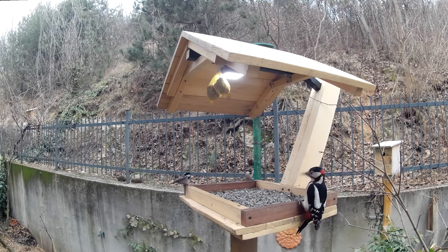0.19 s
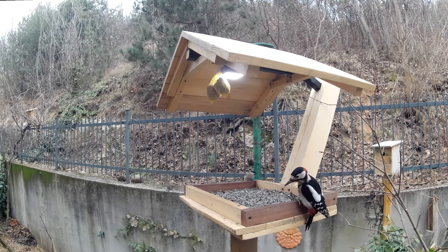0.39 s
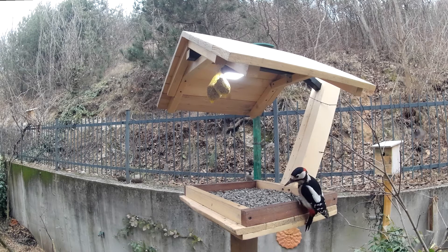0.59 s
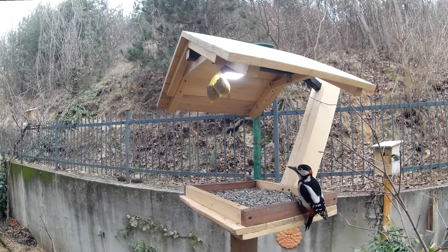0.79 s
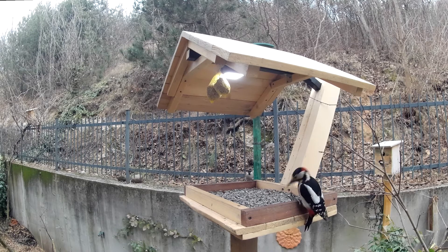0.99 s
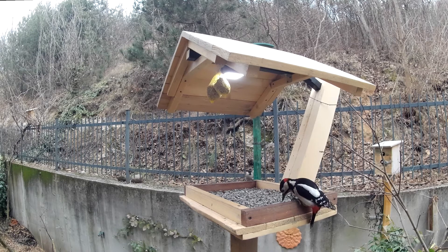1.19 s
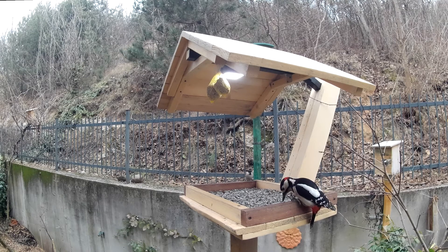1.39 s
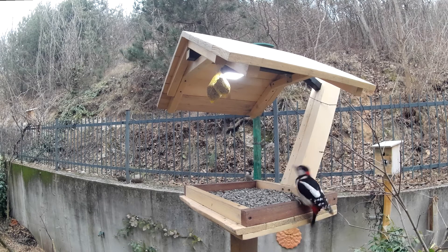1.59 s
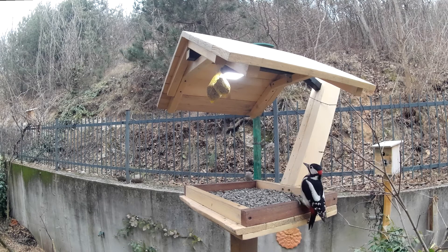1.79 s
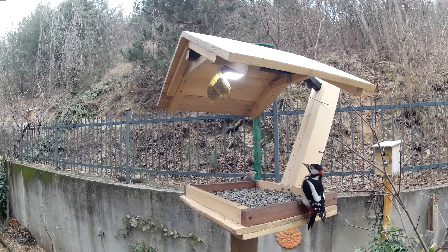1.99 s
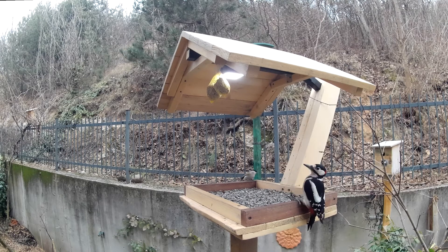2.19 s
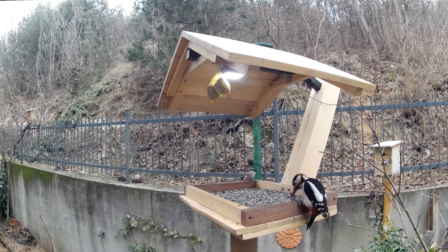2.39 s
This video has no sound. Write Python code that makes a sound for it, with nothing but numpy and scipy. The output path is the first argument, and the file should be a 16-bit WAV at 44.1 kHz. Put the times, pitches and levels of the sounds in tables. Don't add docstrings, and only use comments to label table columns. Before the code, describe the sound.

A woodpecker lands hard on a wooden feeder tray, then taps and stirs the seeds

```python
import sys
import numpy as np
from scipy import signal
from scipy.io import wavfile
from scipy.ndimage import uniform_filter1d

SR = 44100
rng = np.random.default_rng(int(sys.argv[2]) if len(sys.argv) > 2 else 0)


def volts_from_db(level):
    exponent = np.asarray(level, float) / 20
    return 10 ** exponent


def store_wav(level_fs):
    pcm = np.round(np.clip(np.atleast_2d(level_fs), -1, 1) * 32767)
    wavfile.write(sys.argv[1], SR, pcm.T.astype(np.int16))


N = 110250
PEAK_AT = 200

# frequency_hz, density_db (per Hz)
HISS = [(30, -1), (300, -2.5), (900, -12), (2000, -15), (5000, -17.5), (9000, -22.5), (15000, -36.5)]
# start_ms, length_ms
CURRENT_PAUSES = [(3.5, .25), (7.1, .28), (9.65, .55), (12.55, .55), (15.45, .55), (18.35, .55), (21.2, .5)]
# pitch_hz, width_hz, level_db
WHINES = [(2780, 40, -73), (3120, 51, -80), (10720, 200, -83), (12600, 450, -85.5)]
# frequency_hz, density_db (per Hz)
GARDEN = [(150, -5), (400, 3.5), (1500, 1), (2800, -8.5), (4000, -9.5), (6000, -16), (8500, -15.5),
          (15000, -34)]
# frequency_hz, density_db (per Hz)
WIND = [(20, 0.5), (60, 0), (120, -4), (200, -8), (350, -17.5), (600, -27), (1200, -56.5)]
# time_s, level_db
GUSTS = [(0, -53), (.08, -56.5), (.17, -54.5), (.23, -32), (.29, -46), (0.331, -56.5), (0.451, -57.5),
         (1.801, -63), (1.85, -47.5), (1.95, -60), (2.098, -64)]
# start_s, pitch_hz,
# swings (cycles), level_db, sign (+1 or -1)
PUFFS = [
    (0.185, 88, 1.12, -20.5, -1),
    (.192, 198, 3.2, -31, 1),
    (.221, 50.6, 1.7, -9.5, 1),
    (0.238, 40.2, .52, -22, -1),
    (.2485, 30, 1.05, -14, 1),
    (.284, 27, 1.4, -27, 1),
    (.312, 480, 1.53, -22.5, -1),
    (.6478, 405, 1.6, -38.5, 1),
    (.6945, 320, 1.53, -37.5, 1),
    (1.828, 105, 5.9, -44, -1),
]
# pitch_hz, width_hz, level_db
BOARD = [(1134, 420, 0.5), (1820, 310, 2.5), (2597, 340, 1.5)]
SHELL = [(3696, 890, -2), (4316, 800, 0.5), (5200, 2700, -10.5), (3100, 930, -10.5)]
CRACK = [(6090, 1100, -9.5), (7577, 800, -1.5), (8600, 800, 0.5), (11390, 3100, -6), (13650, 3100, -10.5)]
# pitch_hz, width_hz, level_db
SEED_SHELL = [(3812, 600, 1.5), (4222, 630, -5.5), (3124, 430, -12), (5103, 710, -16)]
TAP_BOARD = [(1120, 340, -3.5), (1494, 460, 0.5), (2760, 490, -2.5)]
# start_s, length_s, shell_db, board_db and crack_db (relative to shell)
SCRAPES = [(0.237, 0.061, -30, -1.5, -10), (0.279, 0.051, -30.5, -10, -6), (0.304, 0.013, -24, -6, -11),
           (0.31, 0.088, -44, -1, -44), (0.34, .011, -33, -24, -10), (0.402, 0.067, -53.5, 1, -2.5),
           (0.639, 0.028, -44, 2.5, -8.5), (0.66, 0.015, -42, -4, -6.5), (0.677, 0.016, -60, -14, -12),
           (0.702, 0.035, -50.5, 11.5, -4), (.726, 0.024, -45.5, 7.5, -3), (0.615, 0.19, -52.5, -2, -2),
           (0.741, 0.027, -50, 10, -5), (0.762, 0.034, -46.5, 4.5, -12.5), (0.845, 0.049, -48, 6.5, -11),
           (1.134, 0.067, -62, -10.5, 2.5), (1.166, 0.039, -48.5, -1, -5), (1.386, .02, -66, 1, -9),
           (1.48, 0.023, -62, 0, -7), (1.718, 0.056, -47.5, -5.5, -8.5), (1.859, 0.1, -55, 1, -7.5),
           (1.977, 0.039, -64, -1, -10)]
# time_s, pitch_hz, level_db
SQUEAK = [
    (.266, 833, -34),
    (.273, 1315, -33),
    (.277, 1780, -25.5),
    (0.286, 1964, -31),
    (0.297, 1904, -29),
    (0.301, 1699, -29.5),
    (0.311, 1360, -34),
]
# peak_s, shell_db, board_db and crack_db (relative to shell)
TAPS = [(.922, -52.5, -1, 0), (0.9818, -49, 4, -8.5), (0.9995, -49, -9.5, -11), (1.035, -51, -8, -14),
        (1.066, -37, -8, -10.5), (1.0983, -52, -10, -17), (1.112, -30, -17.5, -23), (1.1579, -21, -4.5, 5),
        (1.178, -36, -6, -4), (1.193, -45, 4.5, -18.5), (1.2182, -48, 2, 2), (1.3071, -50.5, -5, 4.5),
        (1.342, -55, -1, -8.5), (1.369, -40.5, -8, -20.5), (1.48, -46.5, -11.5, -2.5),
        (1.487, -59.5, -10.5, -4), (1.495, -52.5, -8, -5), (1.704, -44, -14, -15),
        (1.729, -35.5, -7.5, -14), (1.7313, -29.5, -2, -16), (1.741, -36.5, -0.5, -0.5),
        (1.746, -41.5, 0, -10), (1.7512, -49, 7, 0), (1.764, -58, -6, 6), (1.7805, -34, -6.5, -3.5),
        (1.8014, -40.5, -1.5, -1.5), (1.841, -52, 3, -6), (1.867, -39, -3, -9), (1.885, -37, -15, 1.5),
        (1.891, -37.5, -10, 4.5), (1.901, -35.5, -8, -10), (1.929, -44.5, -4, 2.5), (1.94, -43, 3, 4.5),
        (1.975, -57, -6, 3.5), (1.9876, -42.5, -2.5, -5), (1.996, -51.5, -4, -6), (2.06, -57, -7, 6.5),
        (2.1685, -46, -4, -5.5), (2.328, -49, -2.5, 2)]
# peak_s, shell_db, board_db and crack_db (relative to shell), board_hz
KNOCKS = [(0.2264, -43, 5.5, -7, 2150), (0.2501, -13.5, 3, -0.5, 4772), (0.2504, -2.5, -7, -13.5, 1870),
          (0.2511, -23, 5, -4, 2800), (0.2516, -15, 4, -2, 2610), (.2567, -13, -15, -2, 3300),
          (0.2598, -24, -22, 10, 1880), (.2892, -19, -9, -6, 1875), (0.3126, 0.5, -9.5, -22, 2480),
          (.3139, 4.5, -12.5, -8.5, 2440), (0.3164, -14, 6, 12.5, 2560), (.3415, -25.5, -3.5, -8.5, 2660),
          (0.3485, -20.5, -9, -12, 2693), (.362, -46, -6, 4, 1178), (0.4265, -34, 4.5, 11, 1742),
          (0.4273, -45.5, 15.5, 17.5, 5750), (.649, -30.5, 10.5, 9.5, 4470), (0.6504, -38, 6, -4.5, 1280),
          (.659, -28, -11, -4.5, 1310), (.668, -29.5, -8.5, -0.5, 2160), (0.6707, -30.5, 3, 6, 4500),
          (0.6958, -21.5, 7, -10, 1167), (0.705, -26.5, -3, -4, 4400), (0.7068, -35.5, 18.5, -6, 2490),
          (0.7256, -35, -1, 10.5, 2300), (0.735, -49, 16, -3, 2300), (0.7474, -42.5, 17, -10, 2380),
          (0.7518, -34.5, 5, -14, 1900), (.791, -52, 9.5, -8.5, 1550), (.8462, -56, 17, -8.5, 1900),
          (0.8497, -25.5, -13.5, -30.5, 2120), (0.8518, -46.5, 13, -12.5, 2130),
          (0.8554, -44, 14.5, -14, 1700), (0.8655, -42.5, 2, 2, 1200), (0.8675, -53, 11.5, -5, 1190)]
# frequency_hz, width_hz, gain_db
TREBLE_DIPS = [(10100, 270, -22.5), (12220, 740, -19), (14000, 300, -12.5), (15500, 300, -8)]


def evened(x):
    return x / np.sqrt(np.mean(x ** 2) + 1e-20)


def add(mix, start_s, sound):
    part = mix[round(start_s * SR):][:len(sound)]
    part += sound[:len(part)]


def ring(x, modes, tune=0.95):
    out = 0
    for k, (hz, width_hz, db) in enumerate(modes):
        r = np.exp(-np.pi * width_hz / SR)
        poles = [1, -2 * r * np.cos(2 * np.pi * hz * tune / SR), r * r]
        out = out + (-1) ** k * volts_from_db(db) * signal.lfilter([1 - r, 0, r - 1], poles, x)
    return out


def ring_twice(x, modes, tune=0.95):
    return ring(ring(x, modes, tune), modes, tune)


def noise(spectrum, patch_db):
    bin_hz = np.fft.rfftfreq(1024, 1 / SR)
    hz, db = np.transpose(spectrum)
    real, imaginary, patches = rng.standard_normal((N // 256 + 5, 513, 3)).T
    patches = uniform_filter1d(patches, size=12, axis=0)
    patches = evened(uniform_filter1d(patches, size=10, axis=1))
    level_db = np.interp(np.log(bin_hz + 1), np.log(hz), db)[:, None] + patch_db * patches
    bins = (real + 1j * imaginary) * volts_from_db(level_db)
    return evened(signal.istft(bins, nperseg=1024, noverlap=768)[1][:N])


def hiss():
    return volts_from_db(-64.5) * noise(HISS, 0.85)


def buzz():
    picture_hz, first_s = 30.005, 0.00677
    busy_ms, wobble_ms = 23.2, 0.027
    ease_ms, ease_share = 1.2, 0.38
    coupling_ms, edge_ms = 3.9, 0.068
    pictures = (np.arange(N) / SR - first_s) * picture_hz + 1
    ms = pictures % 1 * 1000 / picture_hz
    slip = wobble_ms * rng.standard_normal((80, 8))[pictures.astype(int)]
    load = (ms < busy_ms + slip[:, -1]) * 1.0
    for k, (start_ms, length_ms) in enumerate(CURRENT_PAUSES):
        since = ms - start_ms - slip[:, k]
        load -= (since > 0) & (since < length_ms)
        load += ease_share * ((since > length_ms) & (since < length_ms + ease_ms))
    leak = np.exp(-1000 / (coupling_ms * SR))
    edge = np.exp(-1000 / (edge_ms * SR))
    pulses = signal.lfilter([1, -1], [1, -leak], load)
    return -volts_from_db(-52) * signal.lfilter([1 - edge], [1, -edge], pulses)


def whines():
    out = np.zeros(N)
    for hz, width_hz, db in WHINES:
        out += volts_from_db(db) * evened(ring_twice(rng.standard_normal(N), [(hz, width_hz, 0)], 1))
    return out


def garden():
    return volts_from_db(-60) * noise(GARDEN, -2)


def wind():
    time_s, gust_db = np.transpose(GUSTS)
    level_db = 6.5 + np.interp(np.arange(N) / SR, time_s, gust_db)
    return volts_from_db(np.minimum(level_db, -35)) * noise(WIND, 0.95)


def puff(hz, swings, db, sign):
    u = np.arange(0, 1, hz / swings / SR)
    swing = np.arcsin(0.93 * np.sin(2 * np.pi * swings * u))
    return np.sign(sign) * volts_from_db(db) * swing * abs(np.sin(np.pi * u ** 0.7)) ** 1.3


def scrape(length_s, db, board_db, crack_db):
    grit_per_s, grit_db = 940, 4
    n = round(length_s * SR)
    pick, size, sign = rng.random((3, 9000))[:, :n]
    clicks = (pick < grit_per_s / SR) * volts_from_db(-grit_db * np.log(np.maximum(size, 0.04))) * (sign - 0.5)
    grit = clicks + 0.26 * (sign - 0.5)
    swell = abs(np.sin(np.pi * np.linspace(0, 1, n) ** 0.64)) ** 2.4
    parts = zip((SHELL, BOARD, CRACK), (0, board_db, crack_db))
    return swell * sum(volts_from_db(db + rel_db) * evened(ring_twice(grit, modes)) for modes, rel_db in parts)


def squeak():
    octave_db, jitter = -4, 0.04
    time_s, hz, db = np.transpose(SQUEAK)
    t = np.arange(time_s[0], time_s[-1], 1 / SR)
    shake = evened(uniform_filter1d(rng.standard_normal(size=8000), size=40))[:len(t)]
    phase = 2 * np.pi * np.cumsum(np.interp(t, time_s, hz) * (1 + jitter * shake)) / SR
    return volts_from_db(np.interp(t, time_s, db)) * (np.sin(phase) + volts_from_db(octave_db) * np.sin(2 * phase))


def strike(db, board_db, crack_db, contact_ms, shell, board):
    rise_share, detune, thud_db = 0.3, 0.048, -7.5
    u = np.maximum(np.arange(-PEAK_AT, 900) / SR * 1000 / contact_ms, 0)
    force = np.minimum(u / rise_share, 1) * np.exp(-2.2 * np.maximum(u - rise_share, 0))
    blow = rng.standard_normal(len(u)) * force
    tune = 1 + detune * rng.uniform(-1, 1)
    parts = [ring_twice(blow, modes, tune) for modes in (shell, board, CRACK)]
    parts.append(ring(blow, [(433, 1900, 0)]))
    out = 0
    for part, rel_db in zip(parts, (0, board_db, crack_db, board_db + thud_db)):
        peak = abs(part).argmax()
        out = out + volts_from_db(db + rel_db) * np.roll(part, PEAK_AT - peak) / abs(part[peak])
    return out


def tap(db, board_db, crack_db):
    return strike(db - 1.5, board_db, crack_db, 0.8, SEED_SHELL, TAP_BOARD)


def knock(db, board_db, crack_db, board_hz):
    spot = (board_hz, min(board_hz * 0.26, 480), 0)
    board = [spot] + [(hz, width_hz, level_db - 12) for hz, width_hz, level_db in BOARD]
    return strike(db - 0.5, board_db, crack_db, 0.59, SHELL, board)


def scene():
    hum = buzz()
    right = hum + hiss()
    left = wind() + garden() + whines()
    left *= volts_from_db(-4.5 * np.interp(np.arange(N) / SR, [0.33, 0.45, 0.62], [0, 1, 0]))
    for start_s, *settings in PUFFS:
        add(left, start_s, puff(*settings))
    for start_s, *settings in SCRAPES:
        add(left, start_s, scrape(*settings))
    add(left, SQUEAK[0][0], squeak())
    for peak_s, *settings in TAPS:
        add(left, peak_s - PEAK_AT / SR, tap(*settings))
    for peak_s, *settings in KNOCKS:
        add(left, peak_s - PEAK_AT / SR, knock(*settings))
    return np.array([left + volts_from_db(-19) * hum, right])


def band_limit(x):
    return signal.sosfilt(signal.butter(12, 15940, fs=SR, output="sos"), x)


def record(dry):
    hz = np.linspace(0, SR / 2, 513)
    dips_db = sum(db * np.exp(-((hz - f) / width_hz) ** 2) for f, width_hz, db in TREBLE_DIPS)
    gain = volts_from_db(dips_db) * (hz < 15900)
    taps = signal.firwin2(511, hz, gain, fs=SR)[None]
    filtered = signal.oaconvolve(np.clip(dry, -1, 1), taps, "same")
    mix = np.clip(filtered, -1, 1)
    return band_limit(mix)


dry = scene()
out = record(dry)
store_wav(out)
```